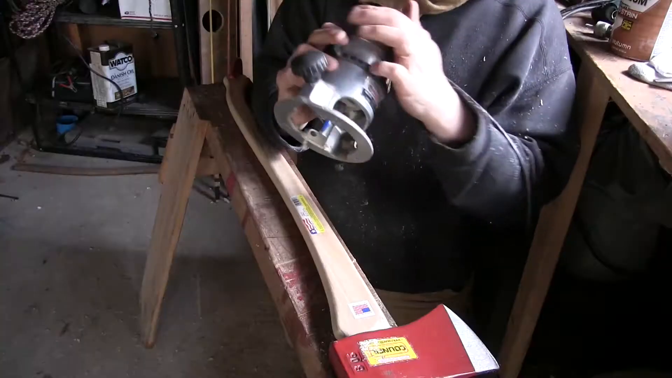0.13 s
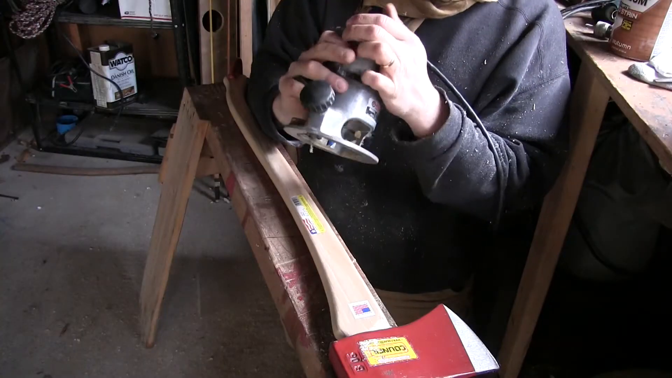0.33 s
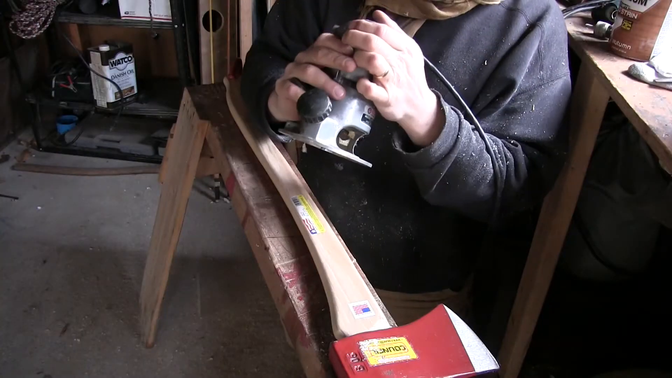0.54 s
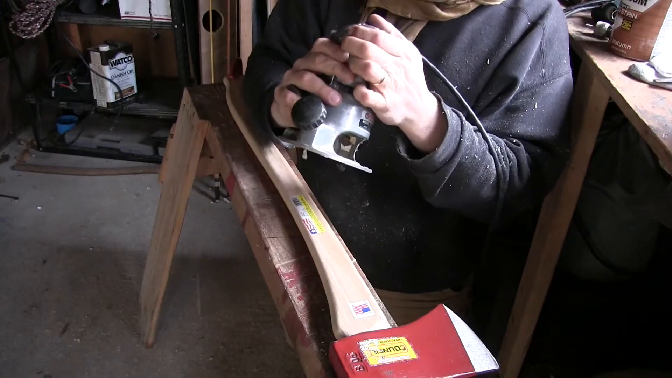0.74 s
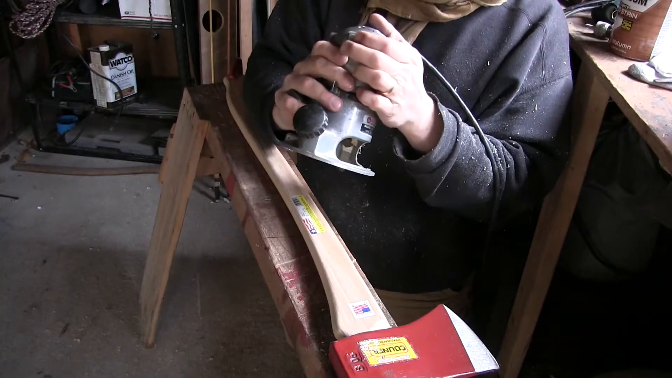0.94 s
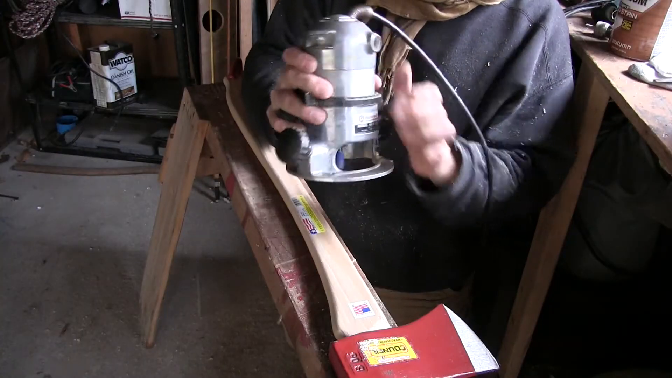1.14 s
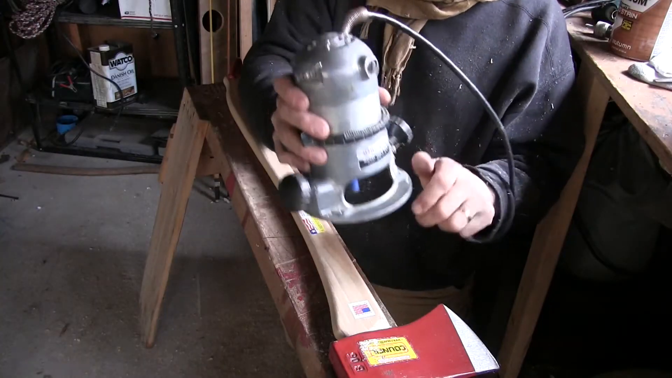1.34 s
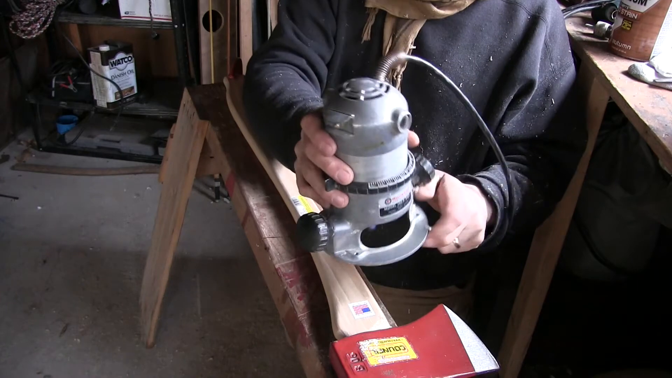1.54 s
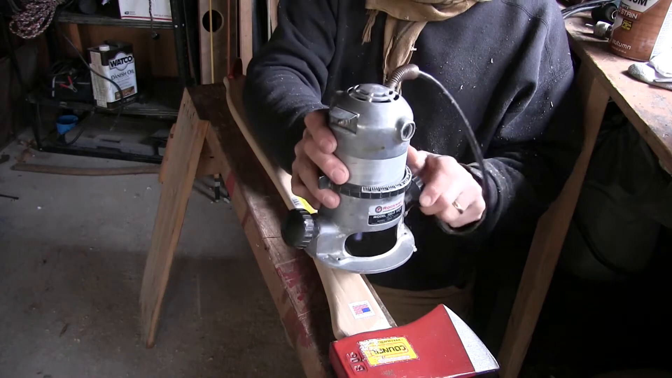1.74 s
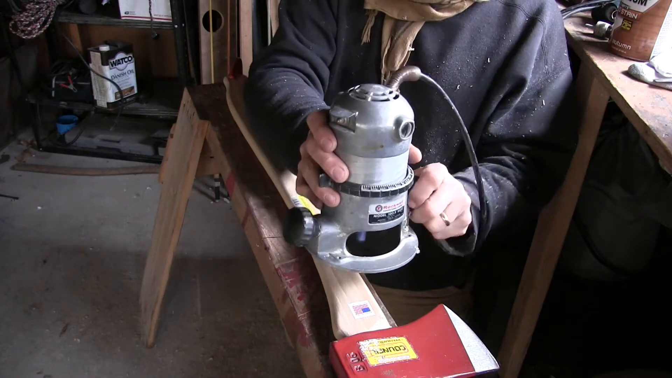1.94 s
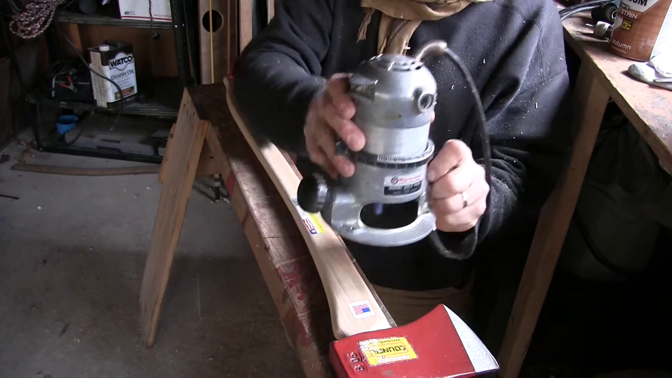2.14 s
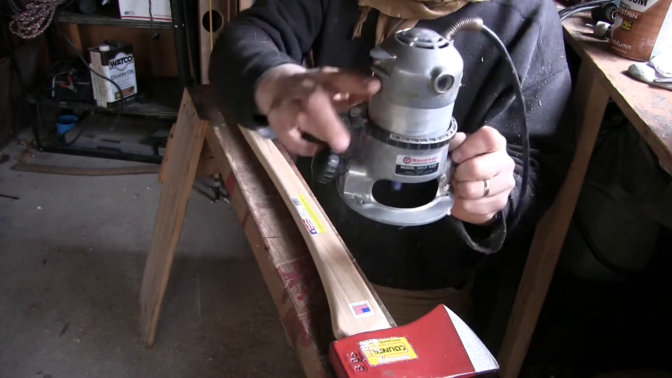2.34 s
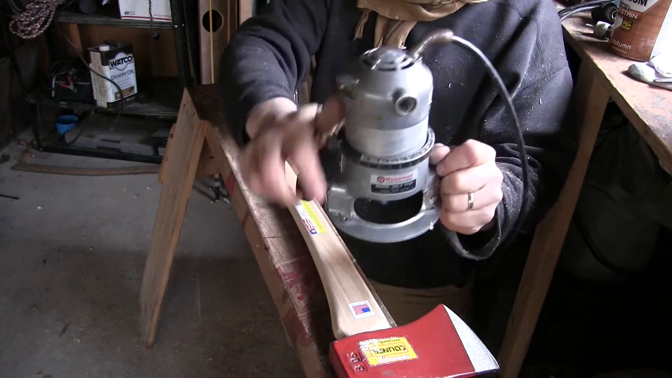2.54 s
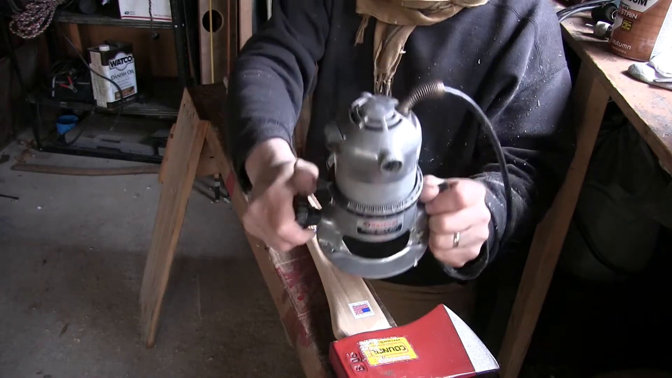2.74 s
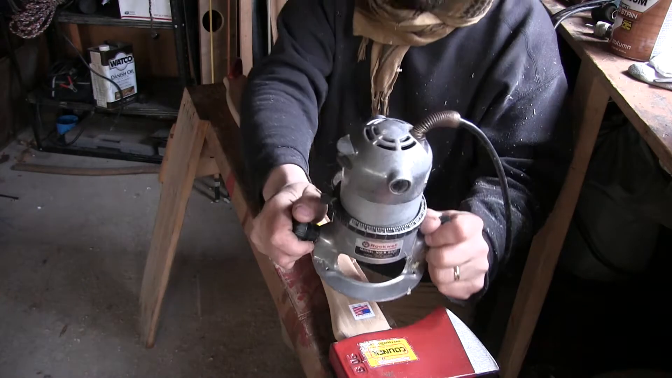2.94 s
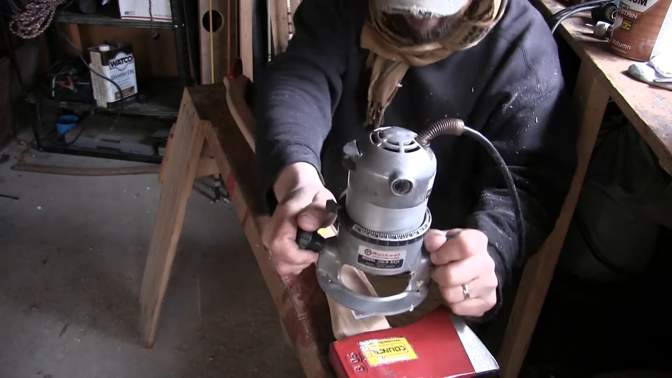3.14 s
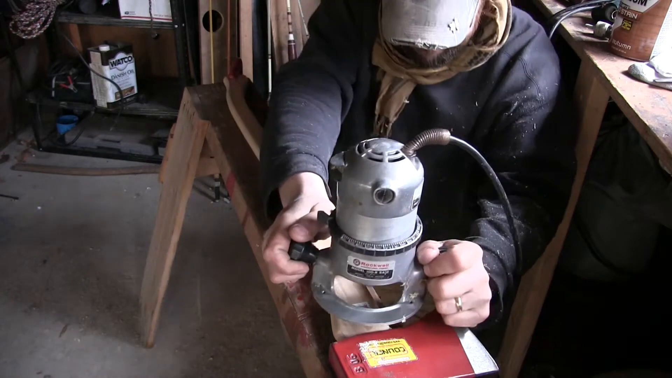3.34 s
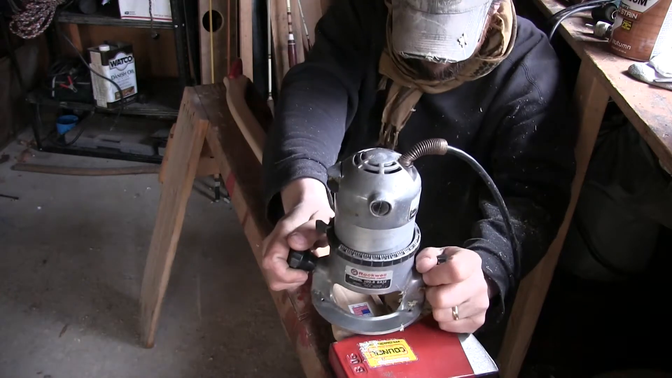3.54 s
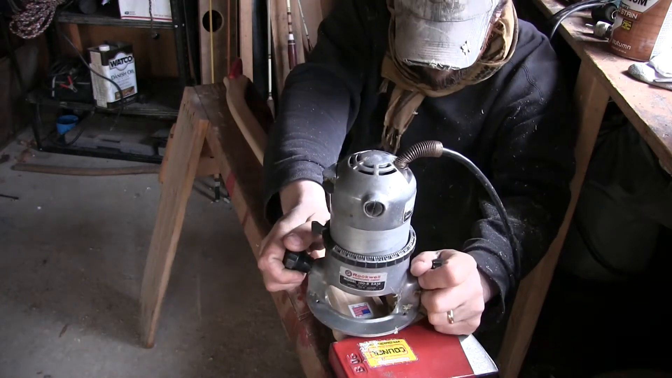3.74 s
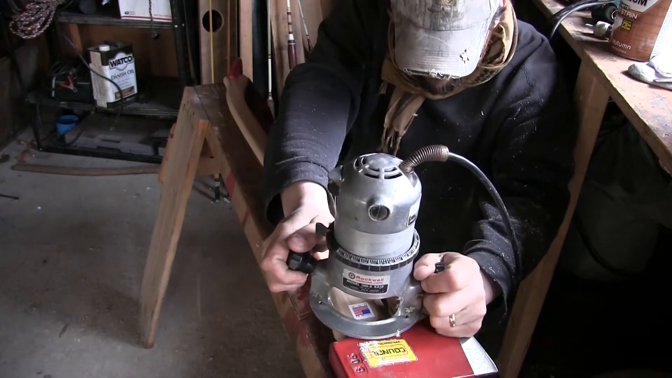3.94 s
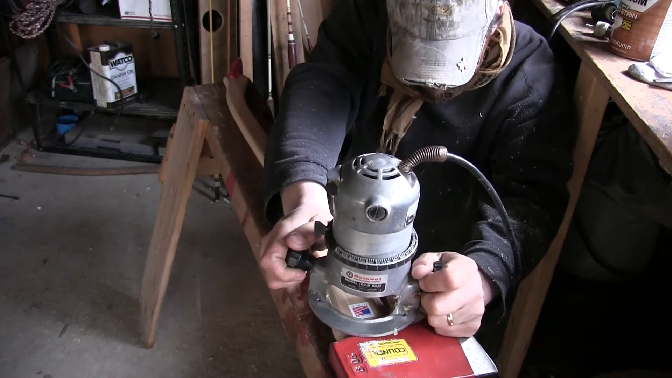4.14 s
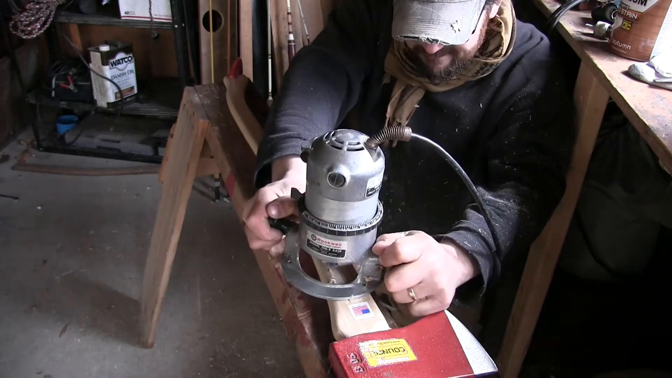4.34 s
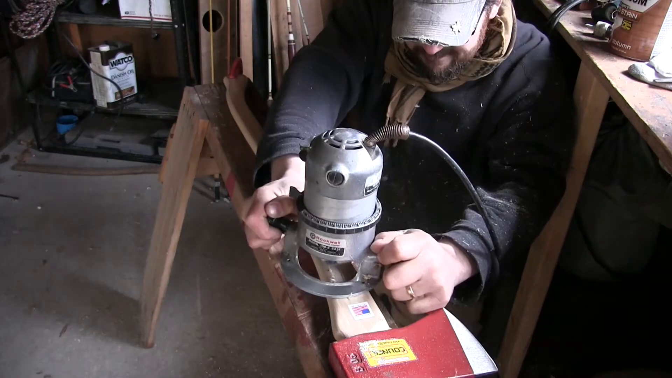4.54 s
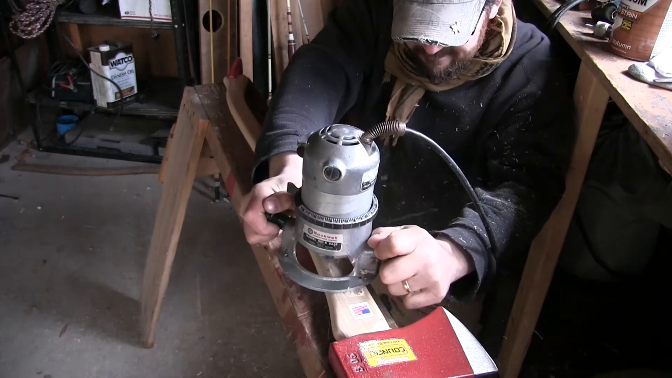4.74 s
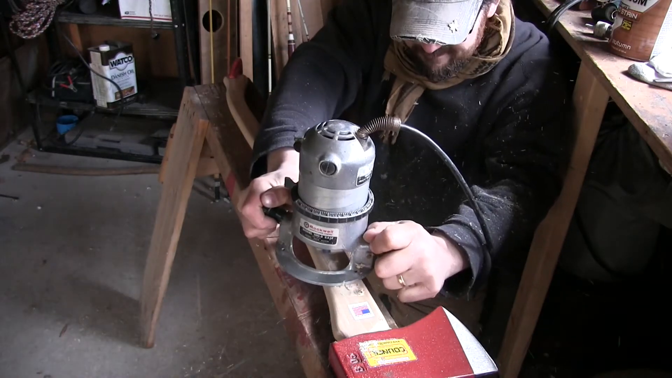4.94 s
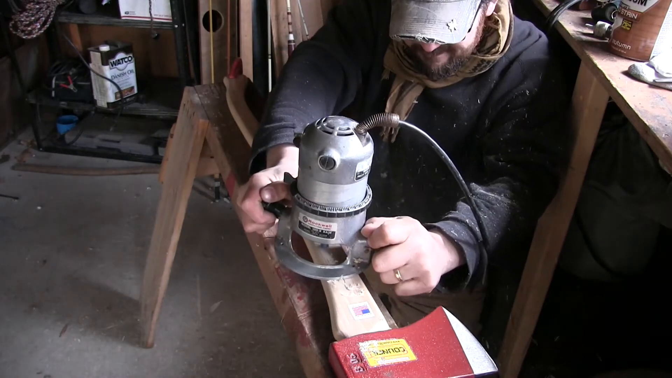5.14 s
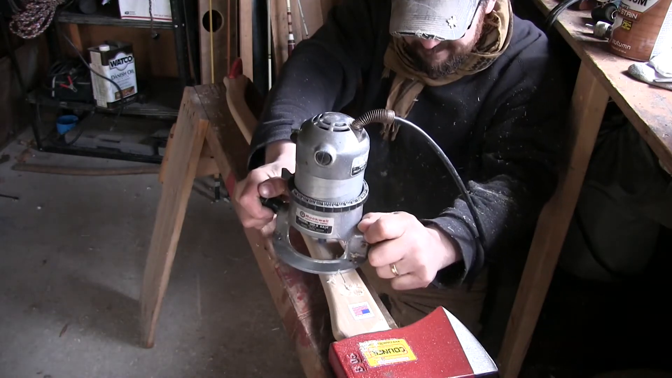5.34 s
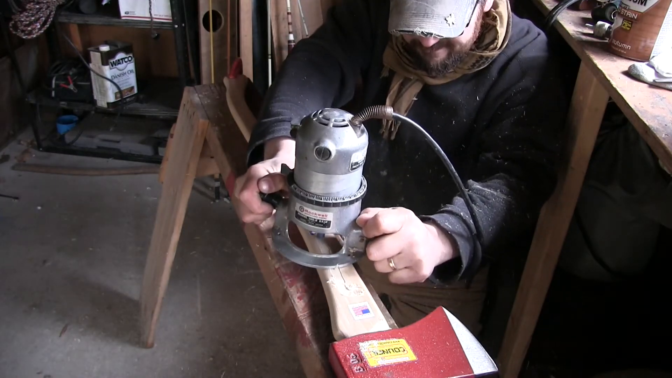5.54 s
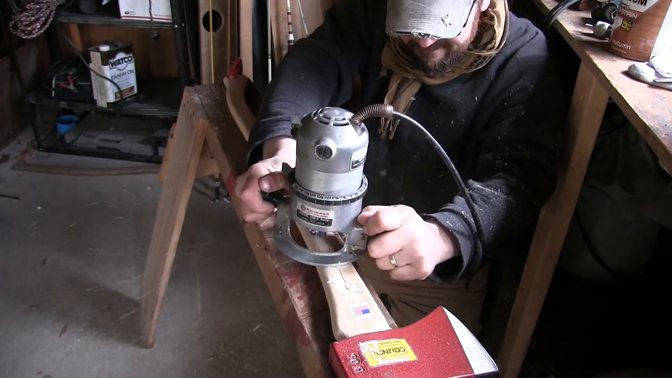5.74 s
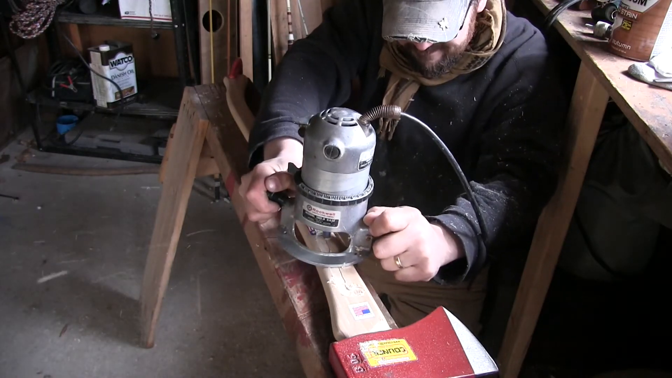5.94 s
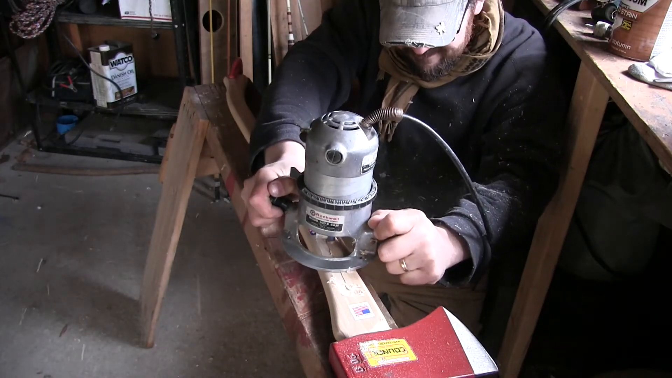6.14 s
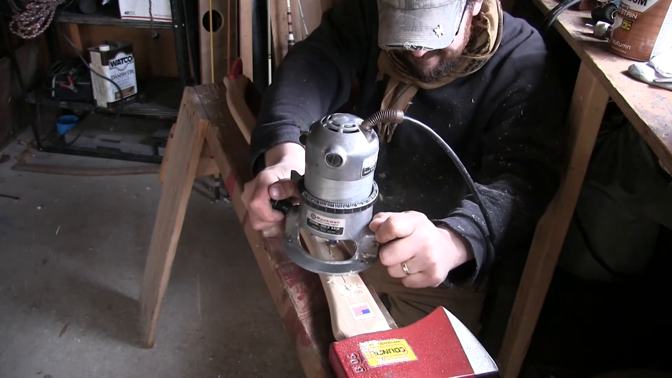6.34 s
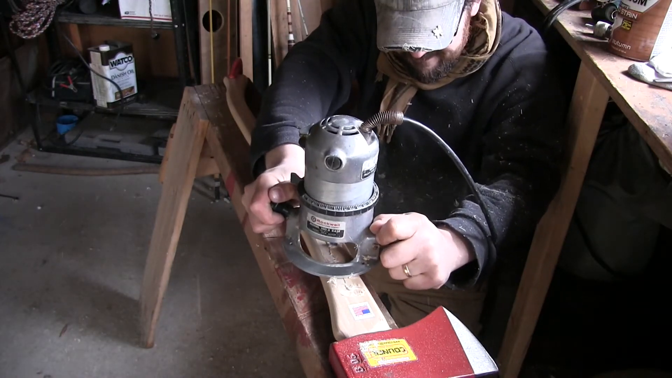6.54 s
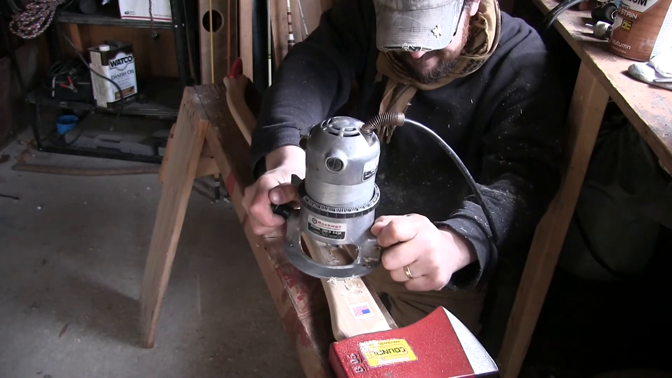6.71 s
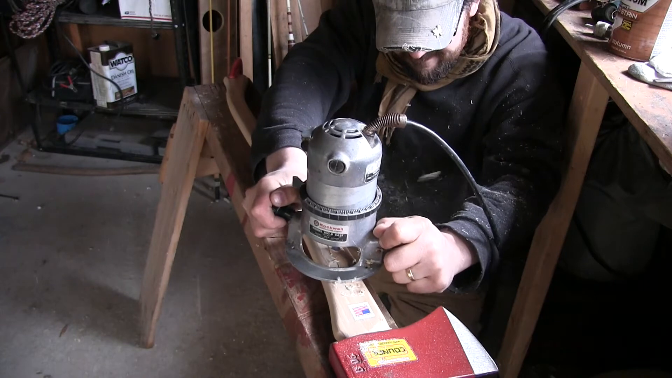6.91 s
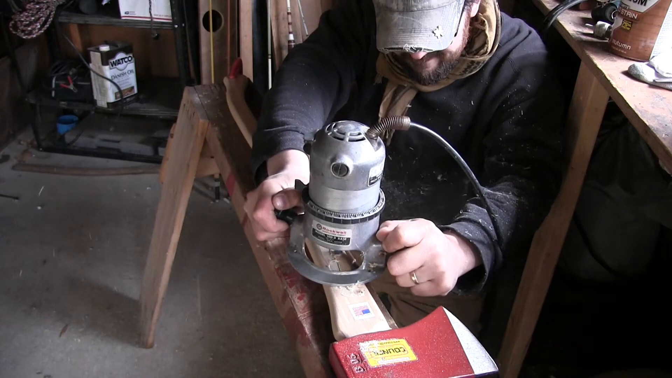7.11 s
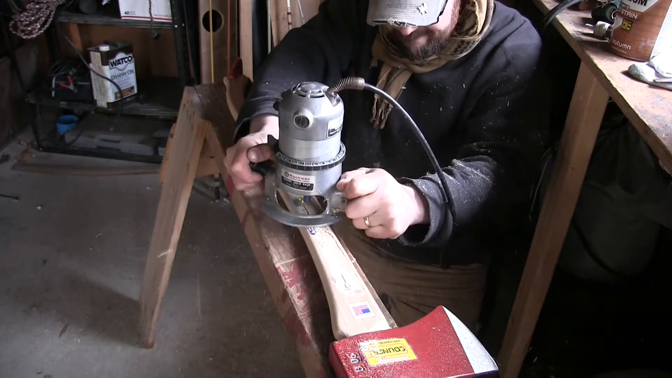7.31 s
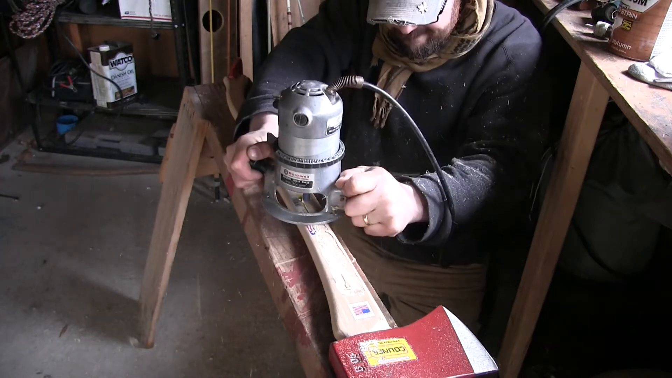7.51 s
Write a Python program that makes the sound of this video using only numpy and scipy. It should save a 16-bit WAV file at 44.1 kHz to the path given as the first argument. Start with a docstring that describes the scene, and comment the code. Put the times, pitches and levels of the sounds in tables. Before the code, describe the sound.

In a small workshop, low rumble, cloth rustle and tiny metallic ticks precede a sharp switch snap. A router motor growls, crackles and climbs quickly to a bright, airy whine. The pitch drops as the bit is cutting wood, adding hum and chopped rasp. Chatter swells into a very short squeal, then the cut continues slightly lower and deeper. Close stereo microphone, nearly centred, with loud moments briefly ducked.

```python
"""A hand-held wood router in a small workshop. Over a low noise rumble it is handled (clicks, cloth) and switched on.
The motor growls and sparks in bursts of resonant noise, and its eight-bladed fan whines up to speed as tones.
At 4.3 s the pitch steps down and the bit is already in the wood: hum, cutter tones and chopped noise,
all on one spindle angle. Chatter swells into a short squeal, a limiter ducks, and the cut goes on deeper."""
import sys
import numpy as np
from scipy import signal
from scipy.fft import rfft, irfft, next_fast_len
from scipy.io import wavfile

SR = 44100
rng = np.random.default_rng(int(sys.argv[2]) if len(sys.argv) > 2 else 0)


def bounce(signal):
    """Save signal as a 16-bit WAV file at the path given by the first command-line argument."""
    frames = np.transpose(np.atleast_2d(signal))
    limited = np.clip(frames, -1, 1)
    pcm = np.round(limited * 32767).astype(np.int16)
    wavfile.write(sys.argv[1], SR, pcm)


N = 338247
TIME_S = np.arange(N) / SR
ON_S, CUT_S, MAINS_HZ = .845, 4.3, 60

# Run-up: the speed closes on its free value in a quick and a slow stage.
FREE_TURNS_PER_S, QUICK_SHARE, QUICK_S, SLOW_S = 409.9, .478, .1165, .568
# Torque limit at first: a jolt of switching on, then at most a steady gain.
JOLT_TURNS_PER_S, MOST_GAIN_TURNS_PER_S2 = 50, 870
# Spindle with the bit in the wood. Each row: time in seconds, speed in turns per second.
CUT_SPEED_TURNS_PER_S = [(4.3, 369.5), (4.5, 374.1), (4.68, 376), (5.05, 368.8), (5.3, 370.1),
                         (5.47, 369.1), (5.78, 371.2), (6.07, 369.2), (6.22, 361), (6.5, 359.1),
                         (6.95, 362.6), (7.28, 360.6), (7.32, 357.2), (7.45, 356.4), (7.67, 359.8)]

BLADES, FAN_WANDER_DB, FAN_WANDER_HZ = 8, 0.92, 7.3
# Fan tones. Each row: multiple of the blade rate, base level in dB running free, in the light cut,
# in the deep cut.
FAN_TONES = [(1, -23.5, -21.5, -19.5), (2, -21.5, -24, -20), (3, -28.5, -29, -27.5)]
# Blade tone; the last value holds through the cut. Each row: time in seconds, added level in dB.
BLADE_TONE_ADDED_DB = [(.9, -20), (1.35, -12), (1.45, 1), (2.05, 1.5), (2.2, -2), (2.45, -9), (2.54, 6),
                       (2.85, -0.5), (3.15, 2), (3.3, -5), (3.58, 4), (4.1, 1.5), (4.3, -1)]
# Octave of the blade tone; the last value holds too. Each row: time in seconds, added level in dB.
OCTAVE_ADDED_DB = [(.89, -20), (.95, 8), (1.02, -17), (1.08, 5), (1.22, -1), (1.35, 5), (1.55, -3),
                   (1.87, 2), (2.15, -2.5), (2.28, 2), (2.48, -6.5), (2.85, -4.5), (3.0, 3), (3.65, 3),
                   (4.1, -6.5), (4.3, -11)]

# Cutter tones. Each row: multiple of the spindle speed, base level in dB in the light cut,
# in the deep cut, dB added as chatter builds.
CUTTER_TONES = [(2, -28.5, -32.5, 8), (4, -23.5, -32, -1), (6, -30, -31, 11.5), (7, -35.5, -42, 16)]
CUTTER_WANDER_DB, CUTTER_WANDER_HZ = 2, 3.4
CHATTER_BUILD_S, CHATTER_DECAY_S = 0.6, .07   # before and after the end of the squeal
SQUEAL_FROM_S, SQUEAL_TO_S, SQUEAL_DB = 6.119, 6.157, -7.5
HUM_LIGHT_DB, HUM_DEEP_DB = -26.5, -24.5   # once-a-turn hum of the bit in the wood
# The bit eases off the wood. Each row: centre in seconds, half length to 1/e in seconds, hum loss in dB.
EASINGS = [(4.807, .12, 14), (5.283, 0.096, 14), (5.713, 0.12, 7)]
# Weaker spindle tones. Each row: multiple of the speed, base level in dB running free, in the light cut,
# in the deep cut.
WEAK_TONES = [(2, -40.5, -52, -50), (3, -52, -30.5, -34), (4, -35.5, -57.5, -47), (5, -48, -34, -34),
              (6, -36, -60, -60), (10, -41, -34, -32), (11, -38, -36.5, -38.5), (12, -36, -34, -38),
              (14, -36, -32.5, -36), (28, -46, -52, -54), (32, -47, -44, -50)]
# Fan and cutter tones swell or fade as the tool slides along. Each row: centre in seconds,
# half length to 1/e in seconds, multiple of the speed, peak change in dB.
TONE_SWELLS = [(4.3, 0.13, 4, -8), (4.62, .09, 8, -9), (4.956, 0.083, 4, -11), (5.08, .1, 2, -13),
               (5.45, .08, 2, -4), (6.54, 0.2, 4, 11), (7.35, .14, 8, -7.5), (7.54, 0.14, 24, 8)]

# Broad noise as the tool is moved about. Each row: time in seconds, rasp and air levels in dB before trim.
RUSH_DB = [(1.0, -20, -16.5), (1.45, -18, -18), (1.7, -17.5, -15), (2.5, -18.5, -15), (3.25, -19.5, -16.5),
           (3.8, -21.5, -18.7), (4.05, -16.5, -17), (4.35, -17, -16.5), (4.7, -18, -16), (5.8, -17.5, -16),
           (6.5, -19.5, -18), (7.0, -17.5, -16.5), (7.67, -19, -16)]
# Rasp spectrum. Each row: frequency in Hz, relative density in dB per Hz.
RASP_SPECTRUM = [(60, -62), (130, -28), (300, -13), (490, -9.5), (680, -0.5), (1000, 0), (1450, 0),
                 (1850, -6), (2600, -4.5), (5000, -61)]
# Air spectrum. Each row: frequency in Hz, relative density in dB per Hz.
AIR_SPECTRUM = [(900, -14), (1600, -2), (2200, -2), (2800, -0.5), (3300, -1), (4200, -1), (5200, -1.5),
                (6200, -11), (9000, -30)]
# Brush hiss spectrum. Each row: frequency in Hz, relative density in dB per Hz.
HISS_SPECTRUM = [(3500, -48), (5500, -2), (6600, 0.5), (8500, 2), (9600, -3.5), (11000, -6), (13000, -9.5),
                 (16000, -20)]
HISS_DB, FULL_AIR_TURNS_PER_S = -21.5, 220   # air is fully moving from this speed up
# Resonances of the wood under the bit. Each row: frequency in Hz, width in Hz, relative gain in dB.
WOOD_MODES = [(692, 45, -2), (799, 45, 5), (886, 49, 0.5), (1000, 35, 2.5), (1150, 33, -9), (1210, 33, 7),
              (1358, 11, 11.5), (1560, 61, -19), (1590, 52, -17), (1957, 60, 1)]

# Buzz of the spindle. Each row: time in seconds, level in dB before trim and flutter.
BUZZ_DB = [(.86, -43), (1.05, -31), (1.5, -24), (4.2, -33.5), (7.67, -22)]
# Metal shaken by spindle and brushes. Each row: frequency in Hz, width in Hz, relative gain in dB.
METAL_MODES = [(695, 320, -1.5), (2230, 540, -1.5), (4300, 710, -0.5), (5150, 380, -1), (5860, 320, -2.5),
               (7700, 300, -3.5), (9600, 500, -6.5), (10900, 600, -11.5), (12000, 900, -15),
               (14150, 470, -42)]
# Brushes sparking under the starting current. Each row: time in seconds, level in dB.
SPARKS_DB = [(.845, -20), (.87, -17), (1.0, -17), (1.2, -16.5), (1.35, -25), (1.6, -24), (2.2, -21),
             (3, -47)]
# Inrush growl. Each row: time in seconds, level in dB.
INRUSH_DB = [(.845, -38), (.858, -21), (.868, -10.5), (.9, -12.5), (.925, -15), (.95, -19), (.99, -18),
             (1.06, -37), (1.2, -70)]
# Motor housing. Each row: frequency in Hz, width in Hz, relative gain in dB.
HOUSING_MODES = [(1830, 110, -6), (2150, 70, -2), (2400, 48, -.5)]
# Air rings in vents and base as the tool is turned. Each row: centre in seconds,
# half length to 1/e in seconds, frequency in Hz, nominal width in Hz, peak level in dB.
AIR_SWELLS = [(1.12, 0.25, 675, 150, -23.5), (2.0, 0.29, 5100, 700, -27), (2.0, 0.28, 7850, 690, -31),
              (2.297, 0.14, 4060, 700, -25), (2.473, 0.22, 1410, 300, -20), (2.48, 0.11, 2280, 200, -21.5),
              (3.172, 0.43, 4130, 600, -20), (4.1, 0.26, 4930, 500, -24.5), (5.4, 1.5, 6580, 450, -26),
              (7.556, 0.23, 1520, 506, -25.5)]
# Bearing whistles. Each row: centre in seconds, half length to 1/e in seconds, multiple of the speed,
# peak level in dB.
BEARING_WHISTLES = [(1.3, .15, 7.67, -25), (1.28, 0.12, 14.34, -25), (1.2, 0.083, 20.56, -27),
                    (3.32, 0.14, 12.335, -21), (3.25, 0.18, 14.335, -29), (6.7, 0.76, 14.34, -32)]

# Handling ticks and the switch. Each row: start in seconds, level in dB before trim, ring in Hz,
# 60 dB decay in seconds.
CLICKS = [(.2205, -21.5, 11500, 0.021), (0.221, -20, 5200, 0.025), (.224, -34, 11000, .14),
          (0.267, -29, 5500, .04), (0.2816, -24.5, 5200, 0.071), (.284, -45, 10000, .05),
          (.548, -43, 10000, .08), (0.8458, -7.5, 730, 0.046), (0.847, -2, 11800, 0.013),
          (0.8505, 1, 6460, .012), (.857, 0, 5700, .012)]
# A sleeve brushes the tool as it is lifted. Each row: time in seconds, level in dB.
SLEEVE_DB = [(.055, -80), (.07, -38), (.15, -41), (.3, -40), (.4, -65), (.6, -90)]
# Sleeve spectrum. Each row: frequency in Hz, relative density in dB per Hz.
SLEEVE_SPECTRUM = [(900, -2), (1500, 1), (2600, -9), (3600, -7), (4500, -12), (10000, -21)]
# Low rumble of the shop. Each row: time in seconds, level in dB.
RUMBLE_DB = [(0, -34.5), (.055, -32), (.09, -27.5), (.5, -27), (.81, -27.5), (.86, -35.5), (1.0, -47),
             (1.2, -59), (1.6, -49), (7.67, -54)]
# Rumble spectrum. Each row: frequency in Hz, relative density in dB per Hz.
RUMBLE_SPECTRUM = [(18, -52), (30, -27.5), (161, -6.5), (319, -7.5), (512, -13), (632, -13), (3870, -38.5),
                   (5310, -41), (8740, -46), (9710, -46), (12300, -49), (13300, -49), (16000, -63)]

# Stereo position. Each row: time in seconds, left minus right in dB.
PAN_DB = [(0, -2), (1.5, -1.4), (3.7, -1.5), (4.6, -1.6), (5.2, -0.7), (6.7, -1.2), (7.67, -0.5)]
LIMIT_DB, MOST_DUCK_DB, RECOVER_DB_PER_S, DETECT_S = -8.9, 3.6, 6, .022
CUTOFF_HZ = 16000


def from_db(db):
    """Decibels to gain."""
    return 10 ** (np.asarray(db) / 20)


def rms_one(x):
    """Scale to unit power."""
    return x / np.sqrt(np.mean(x ** 2) + 1e-20)


def in_time(rows):
    """Each column of a curve, sample by sample."""
    s, *columns = np.transpose(rows)
    return [np.interp(TIME_S, s, column) for column in columns]


def after(s):
    """Opens over 3 ms from time s."""
    return np.clip((TIME_S - s) / .003, 0, 1)


def bell(centre_s, half_s):
    """Smooth rise and fall, 1 at the centre."""
    return np.exp(-((TIME_S - centre_s) / half_s) ** 2)


def mains_pulse(depth):
    """Ripple around 1 at twice the mains rate, one crest per half cycle."""
    return 1 + depth * np.cos(4 * np.pi * MAINS_HZ * TIME_S)


def drift(rate_hz):
    """Slow chance with spread 1: noise through two equal poles, computed every 40 samples."""
    r = np.exp(-80 * np.pi * rate_hz / SR)
    noise = rng.standard_normal(N // 40 + 2002)
    slow = signal.lfilter([1], [1, -2 * r, r * r], noise)[2000:]   # skip the settling
    return np.interp(np.arange(N) / 40, np.arange(len(slow)), rms_one(slow))


def mid_side(mid, side):
    """Left and right from their common and opposite parts."""
    return mid + side * np.array([[1], [-1]])


def coloured(spectrum, side_db):
    """Stereo noise with the given spectrum; the side part is what the walls return."""
    size = next_fast_len(N)
    hz, db = np.transpose(spectrum)
    bins_hz = np.maximum(np.arange(size // 2 + 1) * SR / size, 1)
    skirts = np.minimum(bins_hz / hz[0], 1) ** 2 * np.minimum(hz[-1] / bins_hz, 1) ** 2
    gain = from_db(np.interp(np.log(bins_hz), np.log(hz), db)) * skirts
    noise = irfft(rfft(rng.standard_normal((2, size))) * gain, size)[:, :N]
    mid, side = rms_one(noise)
    return mid_side(mid, from_db(side_db) * side)


def resonate(x, modes):
    """Parallel two-pole resonances, each with unit peak before its gain."""
    out = 0
    for hz, width_hz, db in modes:
        r = np.exp(-np.pi * width_hz / SR)
        poles = [1, -2 * r * np.cos(2 * np.pi * hz / SR), r * r]
        out = out + from_db(db) * (1 - r * r) / 2 * signal.lfilter([1, 0, -1], poles, x)
    return out


def spindle_speed():
    """Turns per second: a torque-limited run-up from rest, then a step at 4.3 s to the cutting speed."""
    age_s = np.maximum(TIME_S - ON_S, 0)
    quick = QUICK_SHARE * np.exp(-age_s / QUICK_S)
    slow = (1 - QUICK_SHARE) * np.exp(-age_s / SLOW_S)
    free = FREE_TURNS_PER_S * (1 - quick - slow)
    free = np.minimum(free, JOLT_TURNS_PER_S + MOST_GAIN_TURNS_PER_S2 * age_s)
    return free + (in_time(CUT_SPEED_TURNS_PER_S)[0] - free) * after(CUT_S)


def spindle_angle(speed):
    """Radians turned; a slow rotor judders under the pulsing starting torque."""
    straining = np.clip(1 - speed / 250, 0, 1)
    judder = straining * (.07 * np.cos(4 * np.pi * MAINS_HZ * TIME_S) + .05 * drift(80))
    return 2 * np.pi * np.cumsum(speed * (1 + judder + .0003 * drift(14.2))) / SR


def by_stage(free, light, deep):
    """One value for each stage: running free, the light cut, and the deep cut after the squeal."""
    return free + (light - free) * after(CUT_S) + (deep - light) * after(SQUEAL_TO_S)


def swell_db(order):
    """Decibels added to one spindle harmonic by its swells and fades."""
    return sum(db * bell(s, half_s) for s, half_s, k, db in TONE_SWELLS if round(k) == order)


def tone(angle, order, db, flutter, scatter):
    """One spindle harmonic; reflections off the moving tool add a fading copy in each ear."""
    def wave():
        return np.sin(order * angle + rng.uniform(0, 2 * np.pi))

    direct = (1 + flutter * drift(18)) * wave()
    reflected = np.array([drift(3.8) * wave() for ear in range(2)])
    return np.sqrt(2) * from_db(db) * (direct + scatter * reflected)


def fan(angle, spun_up):
    """Blade-passing tone with two harmonics, each wandering in level; the highest grows with speed."""
    gains = from_db(in_time(BLADE_TONE_ADDED_DB)[0]), from_db(in_time(OCTAVE_ADDED_DB)[0]), spun_up
    out = 0
    for (k, *levels_db), gain in zip(FAN_TONES, gains):
        order = BLADES * round(k)
        db = by_stage(*levels_db) + swell_db(order) + FAN_WANDER_DB * drift(FAN_WANDER_HZ)
        out = out + gain * tone(angle, order, db, flutter=0.22, scatter=0.34)
    return out


def cutter_hum(angle):
    """The wood pushes back once a turn: a clean hum that fades as the bit eases off."""
    eased_db = sum(db * bell(s, half_s) for s, half_s, db in EASINGS)
    db = by_stage(HUM_LIGHT_DB, HUM_LIGHT_DB, HUM_DEEP_DB) - eased_db
    return tone(angle, 1, db, flutter=0.085, scatter=0.061)


def cutter_overtones(angle):
    """Rougher multiples of the push of the wood, changed in level as chatter builds and dies."""
    since_s = TIME_S - SQUEAL_TO_S
    building = np.clip(1 + since_s / CHATTER_BUILD_S, 0, 1)
    chatter = building * np.exp(-np.maximum(since_s, 0) / CHATTER_DECAY_S)
    out = 0
    for k, light_db, deep_db, chatter_db in CUTTER_TONES:
        db = by_stage(light_db, light_db, deep_db) + chatter_db * chatter + swell_db(round(k))
        db = db + CUTTER_WANDER_DB * drift(CUTTER_WANDER_HZ)
        out = out + tone(angle, round(k), db, flutter=0.19, scatter=.37)
    return out


def squeal(angle):
    """Chatter locks onto the sixth spindle harmonic until the chip breaks away."""
    edges_s = np.minimum(TIME_S - SQUEAL_FROM_S, SQUEAL_TO_S - TIME_S)
    held = np.clip(edges_s / .006 + .5, 0, 1)
    return held * tone(angle, order=6, db=SQUEAL_DB, flutter=0.11, scatter=0.15), held


def weak_tones(angle):
    """Fainter spindle harmonics, running free and in the cut."""
    out = 0
    for k, *levels_db in WEAK_TONES:
        db = by_stage(*levels_db) + 2 * drift(2.7)
        out = out + tone(angle, round(k), db, flutter=0.55, scatter=0.46)
    return out


def cutter(angle, cutting):
    """Hum, overtones and squeal of the bit in the wood, over the weak spindle tones."""
    locked, held = squeal(angle)
    in_wood = cutter_hum(angle) + (1 - 0.46 * held) * cutter_overtones(angle) + locked
    return cutting * in_wood + weak_tones(angle)


def rushing(angle, cutting, speed):
    """Rasp and vent air chopped by the two cutting edges, brush hiss pulsing at twice the mains rate."""
    rasp_db, air_db = in_time(RUSH_DB)
    flow = np.clip(speed / FULL_AIR_TURNS_PER_S, .01, 1) ** 2.5
    edges = 1 + 0.16 * cutting * np.cos(2 * angle)
    wood = from_db(-2.0) * cutting * rms_one(resonate(rng.standard_normal(N), WOOD_MODES))
    rasp_gain = from_db(rasp_db - 1.9 + 0.73 * drift(8.9))
    rasp = rasp_gain * edges * (coloured(RASP_SPECTRUM, side_db=-12) + wood)
    air_gain = from_db(air_db - 2.0 + 0.3 * drift(5.5))
    air = air_gain * edges * coloured(AIR_SPECTRUM, side_db=-8.5)
    hiss_gain = from_db(HISS_DB + 0.5 * drift(8)) * mains_pulse(0.035)
    hiss = hiss_gain * coloured(HISS_SPECTRUM, side_db=-10.5)
    # remove the lows that the chopping adds below the rasp and air
    low_cut = signal.butter(3, 115, "high", fs=SR, output="sos")
    return signal.sosfilt(low_cut, flow * (rasp + air) + hiss)


def buzz(angle):
    """Brushes and bearings repeat one rough pattern every turn; its harmonics glide through the metal."""
    harmonics = np.exp(2j * np.pi * rng.random(24))   # equal strength, random phase
    shape = irfft(np.r_[0, harmonics], 2048)
    shake = np.interp(angle / (2 * np.pi) % 1, np.linspace(0, 1, len(shape)), shape)
    gain = from_db(in_time(BUZZ_DB)[0] - 3.0) * (1 + 0.8 * drift(32))
    return gain * rms_one(resonate(shake, METAL_MODES))


def sparking():
    """Arcs at the brushes crackle through the metal, most at the crests of the mains."""
    arcs = rng.standard_normal(N) * mains_pulse(0.11) * from_db(1.0 * drift(200))
    direct = rms_one(resonate(arcs, METAL_MODES))
    reflected = rms_one(resonate(rng.standard_normal(N), METAL_MODES))
    return from_db(in_time(SPARKS_DB)[0]) * mid_side(direct, from_db(-16.0) * reflected)


def growl():
    """The starting current shakes the housing in uneven bursts at twice the mains rate."""
    bursts = mains_pulse(0.33) * from_db(1.9 * drift(90))
    shaken = rms_one(resonate(bursts * rng.standard_normal(N), HOUSING_MODES))
    return from_db(in_time(INRUSH_DB)[0]) * shaken


def air_swells():
    """Hollow resonances come and go as the openings turn."""
    out = 0
    for s, half_s, hz, width_hz, db in AIR_SWELLS:
        mode = [(hz, 1.4 * width_hz, 0)]   # widened, since two passes narrow it
        ring = rms_one(resonate(resonate(rng.standard_normal(N), mode), mode))
        out = out + from_db(db) * bell(s, half_s) * ring
    return out


def bearings(angle):
    """The balls roll at rates of their own and sing for a moment at a time."""
    return sum(bell(s, half_s) * tone(angle, k, db, flutter=0.34, scatter=0.2)
               for s, half_s, k, db in BEARING_WHISTLES)


def clicks():
    """Each contact is a brief dying rattle through one broad resonance."""
    out = np.zeros((2, N))
    age_s = np.arange(SR // 4) / SR
    for s, db, hz, t60_s in CLICKS:
        shared = rng.standard_normal(len(age_s))
        own = rng.standard_normal((2, len(age_s)))
        rattle = rms_one(resonate(shared + 0.28 * own, [(hz, 0.2 * hz, 0)]))
        at = int(s * SR)
        out[:, at:at + len(age_s)] += rattle * from_db(db - 5 - 60 * age_s / t60_s)
    return out


def handling():
    """Cloth and small metal contacts before the motor starts, then the switch."""
    return clicks() + from_db(in_time(SLEEVE_DB)[0]) * coloured(SLEEVE_SPECTRUM, side_db=-7)


def rumble():
    """Low noise of the shop, slightly unsteady."""
    return from_db(in_time(RUMBLE_DB)[0] + 0.39 * drift(25)) * coloured(RUMBLE_SPECTRUM, side_db=-9)


def scene():
    """One spindle drives the router's tones and rush; handling and rumble join, then all is panned."""
    speed = spindle_speed()
    angle = spindle_angle(speed)
    cutting = after(CUT_S)
    spun_up = np.clip(speed / 350, .3, 1) ** 5.1   # these tones emerge only near full speed
    tones = fan(angle, spun_up) + spun_up * cutter(angle, cutting) + buzz(angle) + bearings(angle)
    noises = rushing(angle, cutting, speed) + air_swells() + growl() + sparking()
    router = after(ON_S) * (tones + noises)
    pan = from_db(in_time(PAN_DB)[0] * np.array([[.5], [-.5]]))
    return (router + handling() + rumble()) * pan


def limiter(x):
    """The gain drops when the running level passes the threshold and creeps back."""
    keep = np.exp(-1 / (DETECT_S * SR))
    power = signal.lfilter([1 - keep], [1, -keep], np.mean(x ** 2, axis=0))
    over_db = np.clip(10 * np.log10(power + 1e-12) - LIMIT_DB, 0, MOST_DUCK_DB)
    recovered_db = RECOVER_DB_PER_S * TIME_S
    duck_db = np.maximum.accumulate(over_db + recovered_db) - recovered_db
    return x * from_db(-duck_db)


def record(dry):
    """A limiter ducks after loud moments, the highest peaks are rounded and the top is cut."""
    limited = limiter(dry)
    rounded = limited / (1 + np.abs(limited / 1.05) ** 8) ** (1 / 8)
    top_cut = signal.ellip(12, .1, 80, CUTOFF_HZ, fs=SR, output="sos")
    return signal.sosfilt(top_cut, rounded)


dry = scene()
out = record(dry)
bounce(out)
```